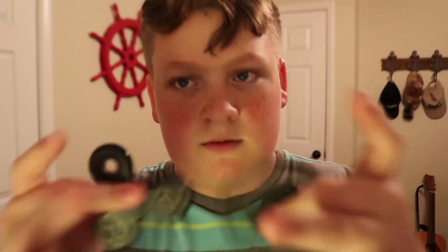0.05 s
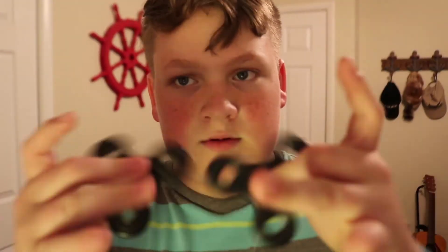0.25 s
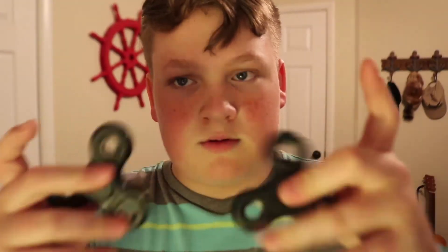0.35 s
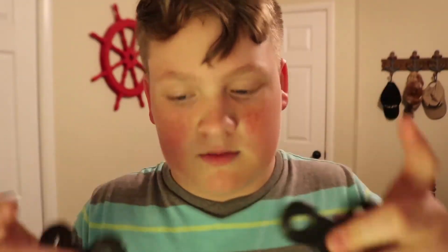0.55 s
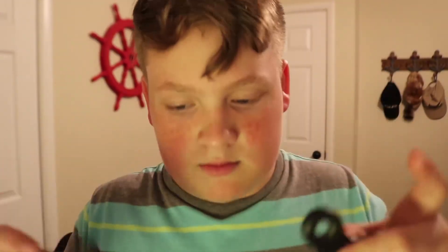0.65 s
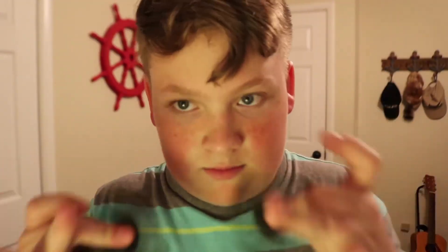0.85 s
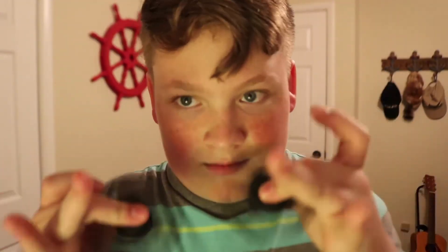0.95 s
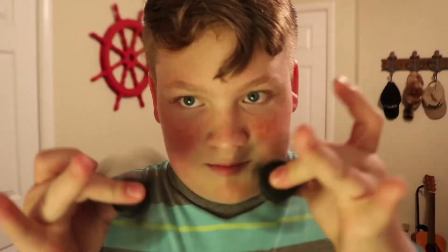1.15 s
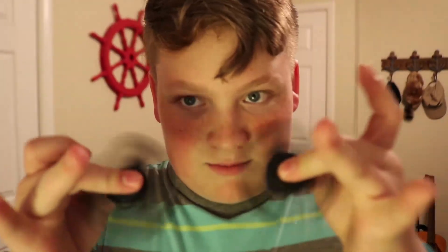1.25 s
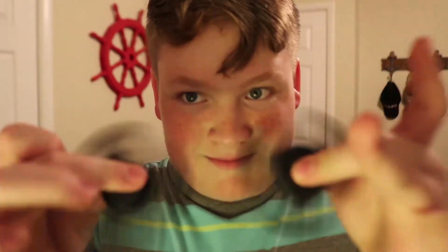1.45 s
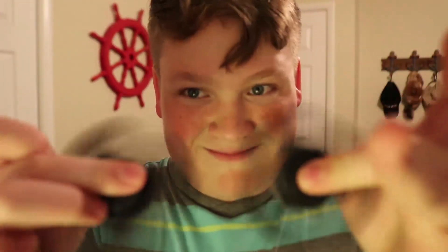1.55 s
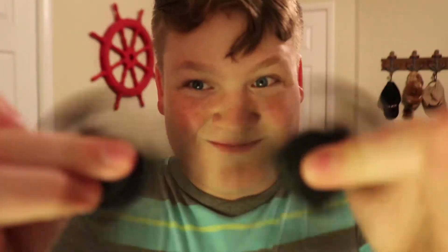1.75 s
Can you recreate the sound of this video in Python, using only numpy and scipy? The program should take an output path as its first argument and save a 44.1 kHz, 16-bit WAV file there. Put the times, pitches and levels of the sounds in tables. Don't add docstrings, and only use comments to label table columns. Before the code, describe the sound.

Two fidget spinners held close to the microphone in a quiet bedroom: small finger ticks and a soft low puff, two sharp plastic-and-metal clacks, a brief lull, then grainy bearing whir with loose rattling.

```python
import sys
import numpy as np
from scipy import signal
from scipy.io import wavfile
from scipy.ndimage import uniform_filter1d

SR = 44100
rng = np.random.default_rng(int(sys.argv[2]) if len(sys.argv) > 2 else 0)


def natural_amplitude(level_db):
    exponent = np.asarray(level_db, float) / 20
    return 10 ** exponent


def digitize_waveform(pressure):
    field = np.atleast_2d(pressure).T
    bounded = np.clip(field, -1, 1)
    quanta = np.round(bounded * 32767).astype(np.int16)
    wavfile.write(sys.argv[1], SR, quanta)


N = 79380


def evened(x):
    return x / np.sqrt(np.mean(x ** 2) + 1e-20)


def read(points, hz):
    point_hz, value = np.transpose(points)
    return np.interp(np.log(hz + 1), np.log(point_hz + 1), value)


def add(mix, start_s, sound):
    part = mix[int(round(start_s * SR)):][:len(sound)]
    part += sound[:len(part)]


def swell(u):
    return u * np.exp(1 - u)


def resonate(x, hz, width_hz):
    turn = np.exp(2j * np.pi * np.cumsum(hz * np.ones(len(x))) / SR)
    r = np.exp(-np.pi * width_hz / SR)
    return 2 * (turn * signal.lfilter([1 - r], [1, -r], x / turn)).real


def resonate_twice(x, hz, width_hz):
    return resonate(resonate(x, hz, width_hz), hz, width_hz)


def drift(rate_hz):
    span = max(int(SR / rate_hz), 1)
    return evened(uniform_filter1d(uniform_filter1d(rng.standard_normal(N), span), span))


def ball_taps():
    hits_per_s, spread_db = 1800, 2.6
    strength = natural_amplitude(spread_db * np.minimum(rng.exponential(1, N), 3))
    struck = rng.random(N) < hits_per_s / SR
    return evened(strength * struck * rng.choice([-1, 1], N))


# start_s [s], level_db [dB], steel_db over plastic [dB]
SPIN_CURVE = [(0.03, -76, -17), (.11, -62, 0), (.16, -68, 2), (.228, -71, -10), (.236, -54.5, 7),
              (.3, -51.5, -5.5), (.38, -62.5, 0.5), (.46, -76.5, -9), (0.732, -76, -11), (.78, -65.5, -1),
              (.81, -58, 1.5), (1.05, -59, 4.5), (1.2, -57.5, 6), (1.44, -55.5, 7.5), (1.485, -58, 5),
              (1.55, -54, 6), (1.64, -58, 6), (1.8, -55, 1)]
# mode_hz [Hz], width_hz [Hz], level_db [dB]
HUB_MODES = [(2534, 750, 0), (3240, 610, 1), (4300, 870, -4), (1435, 180, -11.5), (302, 280, -12)]
# mode_hz [Hz], width_hz [Hz], level_db [dB]
RACE_MODES = [(6450, 1400, -14.5), (7540, 790, 0), (8530, 790, 0.5), (8770, 2100, -4), (10500, 1100, -9.5),
              (12660, 2500, 1.5), (13900, 1900, -12)]


def bearings():
    shared_part, roll_db, waver, patch_db, flutter_db = .48, -6, .012, .8, 2.1
    parts = []
    for modes in (HUB_MODES, RACE_MODES):
        part, shared = 0, ball_taps()
        for mode_hz, width_hz, level_db in modes:
            drive = shared_part * shared + np.sqrt(1 - shared_part ** 2) * ball_taps()
            drive = drive + natural_amplitude(roll_db) * rng.standard_normal(N)
            pitch_hz = mode_hz * (1 + waver * drift(33))
            rung = resonate_twice(drive, pitch_hz, 1.95 * width_hz)
            part = part + natural_amplitude(level_db + patch_db * drift(37)) * evened(rung)
        parts.append(evened(part * natural_amplitude(flutter_db * drift(400))))
    hub, race = parts
    start_s, level_db, steel_db = np.transpose(SPIN_CURVE)
    t = np.arange(N) / SR
    steel = np.interp(t, start_s, steel_db)
    level = natural_amplitude(np.interp(t, start_s, level_db) - 4.5)
    return level * (hub * natural_amplitude(-steel / 2) + race * natural_amplitude(steel / 2))


# start_s [s], mode_hz [Hz], width_hz [Hz], level_db [dB]
FIRST_CLACK = [(.2312, 1355, 296, -34), (.2312, 750, 250, -52), (.2318, 2700, 330, -31),
               (.2312, 3700, 540, -26), (.2314, 4650, 680, -26), (.2325, 6170, 410, -32),
               (.2312, 7040, 880, -27), (.2326, 7800, 370, -27.5), (.2324, 8480, 570, -24),
               (.2321, 9880, 580, -20.5), (.2319, 11000, 820, -21), (.2322, 13100, 650, -30),
               (.2320, 14300, 340, -36), (.2319, 16000, 980, -37)]
# start_s [s], mode_hz [Hz], width_hz [Hz], level_db [dB]
SECOND_CLACK = [(.2808, 420, 274, -44), (.2808, 1190, 250, -41), (.2808, 2300, 244, -32),
                (.2808, 3120, 340, -30.5), (.2814, 4140, 310, -30.5), (.2809, 4930, 610, -38.5),
                (.2808, 6400, 690, -24), (.2810, 7430, 720, -18), (.2820, 7960, 320, -31),
                (.2814, 9010, 480, -21.5), (.2813, 9700, 550, -17.5), (.28125, 10650, 950, -22.5),
                (.2815, 13000, 660, -28.5), (.2813, 13000, 620, -47)]
# start_s [s], mode_hz [Hz], width_hz [Hz], level_db [dB]
TOUCHES_AND_KNOCKS = [(.2921, 2330, 260, -37), (.2926, 3500, 500, -39), (.2922, 6500, 900, -38),
                      (.2930, 8200, 300, -35), (.2921, 10000, 1200, -35), (.2923, 12800, 1000, -37),
                      (.7998, 2850, 450, -43), (.2853, 8200, 450, -37), (.2335, 2900, 500, -38),
                      (.2343, 8050, 350, -36), (.2922, 15000, 900, -44)]


def clack(modes, crack_db, low_hz):
    out, t = np.zeros(N), np.arange(900) / SR
    for start_s, mode_hz, width_hz, level_db in modes:
        ring = swell(np.pi * 1.53 * width_hz * t) * np.sin(2 * np.pi * mode_hz * t)
        crack = natural_amplitude(crack_db - 15) * np.diff(rng.standard_normal(901)) * np.exp(-t / 0.0025)
        add(out, start_s, natural_amplitude(level_db) * (ring + crack))
    return signal.sosfilt(signal.butter(3, low_hz, "high", fs=SR, output="sos"), out)


def clacks():
    first = clack(FIRST_CLACK, crack_db=-2, low_hz=504)
    second = clack(SECOND_CLACK, crack_db=-8, low_hz=297)
    return first + second + clack(TOUCHES_AND_KNOCKS, crack_db=0, low_hz=900)


# start_s [s], peak_db [dB], ring_hz [Hz], length_ms [ms]
FINGER_TICKS = [(0.0673, -46, 3460, 4.2), (0.071, -47.5, 2900, 3.4), (0.0911, -42.5, 4740, 3.9),
                (0.096, -42.5, 7000, 2.5), (0.106, -43.5, 3080, 4.5), (0.1096, -40, 7550, 3.3),
                (0.121, -42.5, 7800, 3.1), (0.1356, -51, 2170, 2.7), (0.1661, -52, 2740, 5.2),
                (0.2542, -38, 7900, 1.9), (0.426, -51, 6450, 2), (0.5627, -55.5, 3230, 2.5),
                (0.6555, -50.5, 2670, 3.3), (0.6854, -69, 3210, 2.5), (0.7106, -55, 2930, 2.1),
                (0.7447, -46.5, 7140, 3.3), (0.7558, -46, 3260, 2.2), (0.7625, -49, 3510, 1.9),
                (0.766, -48, 7200, 3.1), (0.785, -46, 7700, 1.8), (0.792, -38, 7400, 1.7),
                (0.796, -41, 2870, 1.6), (0.8, -35.5, 3240, 1.9), (0.8165, -47, 8400, 2.5),
                (.174, -56, 7000, 2)]
# start_s [s], peak_db [dB], ring_hz [Hz]
CAGE_RATTLE = [(0.2417, -36, 3230), (0.247, -50, 3830), (0.2512, -46, 3880), (0.2536, -42, 3450),
               (0.2569, -42, 3300), (0.2855, -42, 7950), (0.3024, -39, 2630), (0.3386, -46, 3140),
               (0.349, -47.0, 3400), (0.3537, -45.0, 7700), (0.3578, -46.0, 7750), (0.3748, -51.0, 3230),
               (0.3814, -47, 9000), (0.397, -45, 7880), (0.8455, -42, 8570), (0.914, -49, 3230),
               (0.9283, -47, 3190), (0.9619, -50, 3040), (0.9686, -41, 9860), (0.9779, -42.5, 6850),
               (1.017, -42.5, 12020), (1.0516, -44, 10160), (1.14, -41, 7360), (1.152, -41.5, 10400),
               (1.1871, -49, 8700), (1.1961, -39.5, 8910), (1.2139, -40, 8350), (1.2265, -40, 7300),
               (1.2514, -41, 8200), (1.2726, -37.5, 9000), (1.304, -39, 9100), (1.3316, -37, 8400),
               (1.3401, -48, 7540), (1.3492, -38, 8200), (1.3816, -55, 8100), (1.388, -40.0, 12750),
               (1.4225, -40, 7600), (1.4369, -35, 7900), (1.4514, -41.0, 7750), (1.4562, -39.5, 8910),
               (1.4987, -37.5, 12750), (1.5137, -39, 8500), (1.5185, -40, 7240), (1.5346, -42.0, 7920),
               (1.5622, -33.5, 8480), (1.5773, -35, 8150), (1.6104, -39, 12300), (1.615, -41, 13050),
               (1.6386, -42, 8740), (1.678, -38.5, 6900), (1.6828, -41, 8530), (1.6906, -41, 7240),
               (1.7106, -42, 7280), (1.7236, -42, 8800), (1.7578, -35.5, 6930), (1.7648, -37, 6890),
               (1.7738, -40, 8480), (1.7966, -41.0, 3190)]


def ticks():
    out, t = np.zeros(N), np.arange(800) / SR
    rows = [(*row, 1530) for row in FINGER_TICKS]
    rows += [(s, db - 2, hz, 1.13, 0.76 * hz) for s, db, hz in CAGE_RATTLE]
    for start_s, peak_db, ring_hz, length_ms, low_hz in rows:
        puff = rng.standard_normal(800) * swell(t / (abs(length_ms) / 2500 + 1e-4))
        broad = signal.lfilter(*signal.butter(2, [low_hz, 14600], "band", fs=SR), puff)
        sound = evened(resonate(puff, ring_hz, width_hz=820)) + natural_amplitude(-6.5) * evened(broad)
        add(out, start_s, natural_amplitude(peak_db - 3.5) * sound / abs(sound).max())
    return out


def bump():
    start_s, level_db, end_hz, rise_s, t60_s = .0885, -44, 48, .01, 0.11
    sag_hz, sag_s = 45.3, 0.0073
    out, t = np.zeros(N), np.arange(9000) / SR
    turns = end_hz * t + sag_hz * sag_s * (1 - np.exp(-t / sag_s))
    envelope = natural_amplitude(level_db - 60 * t / t60_s) * (1 - np.exp(-t / rise_s))
    add(out, start_s, envelope * 2 * np.sin(2 * np.pi * turns))
    return out


# start_s [s], level_db [dB], mode_hz [Hz],
# width_hz [Hz], length_s [s]
SCUFFS_AND_SURGES = [(0.3, -64, 371, 180, 0.029), (.288, -61, 630, 220, 0.038), (.29, -65.5, 1030, 1500, 0.056),
                     (1.13, -63.5, 1600, 2900, 0.056), (1.3, -75, 285, 114, 0.11), (.04, -68.5, 1020, 1030, 0.13),
                     (1.75, -64, 4500, 4000, 0.03), (1.12, -63, 2980, 1500, 0.027),
                     (1.26, -62.5, 2950, 1600, 0.025), (1.6, -60, 3200, 500, .015),
                     (1.6, -66, 13500, 2000, 0.017), (1.505, -59.5, 7650, 450, .03), (1.61, -72, 327, 100, .02),
                     (.738, -67, 7450, 500, .02), (1.39, -62, 7900, 1200, .03), (1.1, -66.5, 7600, 1000, .025)]


def scuffs():
    out, t = np.zeros(N), np.arange(12000) / SR
    for start_s, level_db, mode_hz, width_hz, length_s in SCUFFS_AND_SURGES:
        envelope = swell(t / (abs(length_s) / 2 + 0.00038))
        rub = evened(resonate_twice(rng.standard_normal(12000), mode_hz, width_hz))
        add(out, start_s, natural_amplitude(level_db) * envelope * rub)
    return out


# band_hz [Hz], t60_s [s]
ROOM_DECAY = [(300, 0.76), (1000, .35), (3000, 0.25), (8000, 0.43), (14000, 0.16)]
# band_hz [Hz], level_db [dB]
ROOM_TONE = [(500, 7.5), (1500, 2.5), (2300, -3), (3300, 8), (5500, -1.5), (8000, -9), (11000, -9),
             (15000, 0)]


def room(x):
    taps = np.zeros((2, SR // 2))
    slots = np.arange(120, SR // 2 - 20, 20)
    at = slots + rng.integers(0, 20, (2, len(slots)))
    np.put_along_axis(taps, at, rng.choice([-1., 1.], at.shape), 1)
    hz, t, z = signal.stft(taps, SR, nperseg=256)
    band_db = read(ROOM_TONE, hz)[:, None] - 60 * t / read(ROOM_DECAY, hz)[:, None]
    mid, side = signal.istft(z * natural_amplitude(band_db), SR, nperseg=256)[1]
    tail = np.array([mid + 0.0063 * side, mid - 0.0063 * side])
    return signal.fftconvolve(x[None], tail / np.linalg.norm(tail[0]), axes=1)[:, :N]


# band_hz [Hz], level_db [dB per Hz]
FLOOR_SPECTRUM = [(15, -15), (25, 1), (156, -8), (400, -12), (497, -15), (633, -14), (898, -13.5),
                  (3180, -20), (15600, -24)]
# band_hz [Hz], likeness [0-1]
FLOOR_LIKENESS = [(60, 0.76), (180, 0.71), (550, 0.45), (1650, 0.66), (4970, 0.53), (15000, 0.13)]
# whine_hz [Hz], width_hz [Hz], level_db [dB]
APPLIANCE_WHINES = [(153.5, 9.1, -90.5), (497.8, 8.3, -84.5), (920, 4.7, -84.5), (3230, 8, -78.5),
                    (3000, 790, -76.5)]


def floor():
    frames, hz = N // 256 + 5, np.fft.rfftfreq(1024, 1 / SR)
    a, b, c, d = rng.standard_normal((frames, 513, 4)).T
    likeness = read(FLOOR_LIKENESS, hz)
    wide = np.sqrt(np.clip((1 - likeness) / (1 + likeness), 0, 1))[:, None]
    mid, side = a + 1j * b, wide * (c + 1j * d)
    z = np.array([mid + side, mid - side]) * natural_amplitude(read(FLOOR_SPECTRUM, hz)[:, None])
    out = natural_amplitude(-66.5) * evened(signal.istft(z, nperseg=1024, noverlap=768)[1][:, :N])
    for whine_hz, width_hz, level_db in APPLIANCE_WHINES:
        out = out + natural_amplitude(level_db) * evened(resonate(rng.standard_normal(N), whine_hz, width_hz))
    return out


def scene():
    hits, spin = clacks() + ticks(), bearings()
    tail = natural_amplitude(-13) * room(hits + natural_amplitude(-3) * spin)
    return hits + spin + bump() + scuffs() + tail + floor()


def lowpass(x, edge_hz, size):
    taps = signal.firwin(size, edge_hz, window=("kaiser", 10), fs=SR)
    return signal.oaconvolve(x, taps[None], "same")


def low_pass(x):
    return signal.sosfilt(signal.butter(12, 16840, fs=SR, output="sos"), x)


def record(dry):
    low, full = lowpass(dry, 15760, size=801), lowpass(dry, 16150, size=141)
    loud = uniform_filter1d(dry[0] ** 2, 128) > natural_amplitude(2 * -36)
    opened = uniform_filter1d(uniform_filter1d(loud * 1., 200), 200)
    opened = np.minimum(opened * 2, 1)
    return low_pass(low + opened * (full - low))


dry = scene()
out = record(dry)
digitize_waveform(out)
```